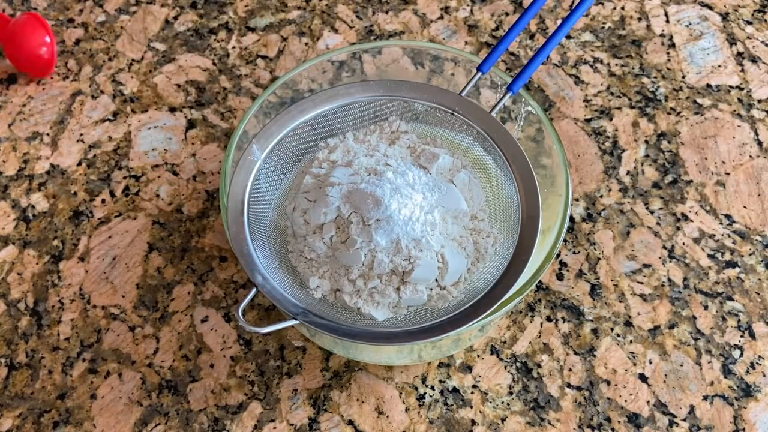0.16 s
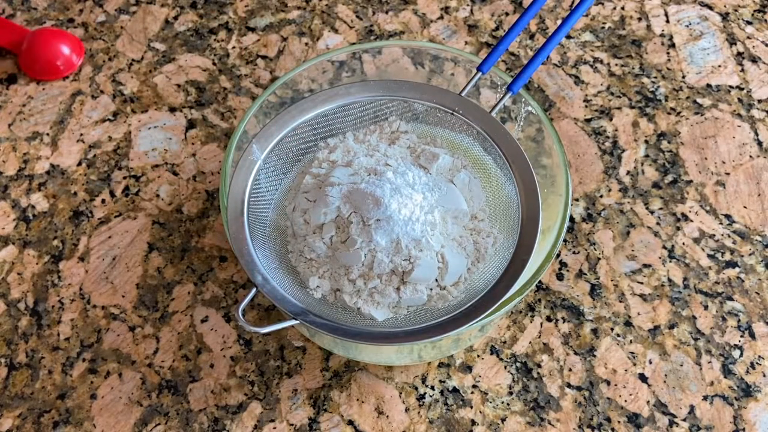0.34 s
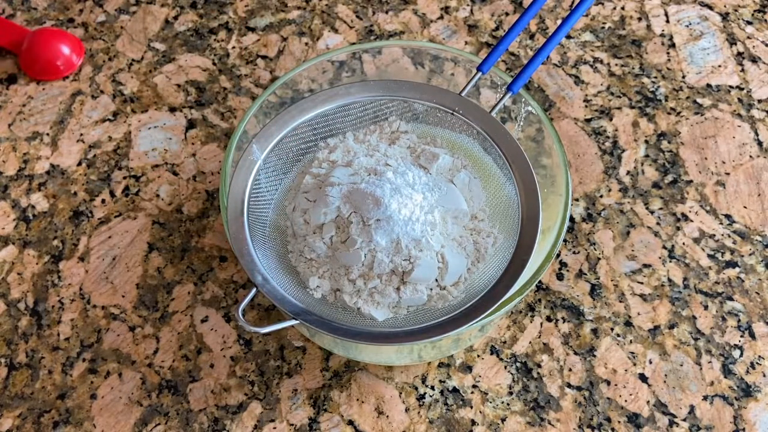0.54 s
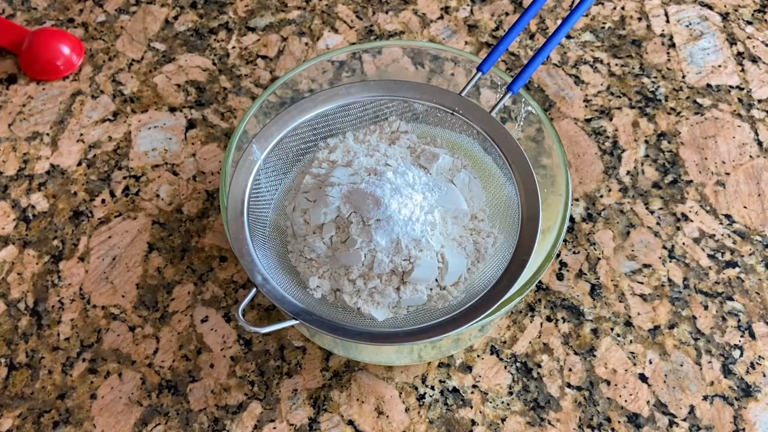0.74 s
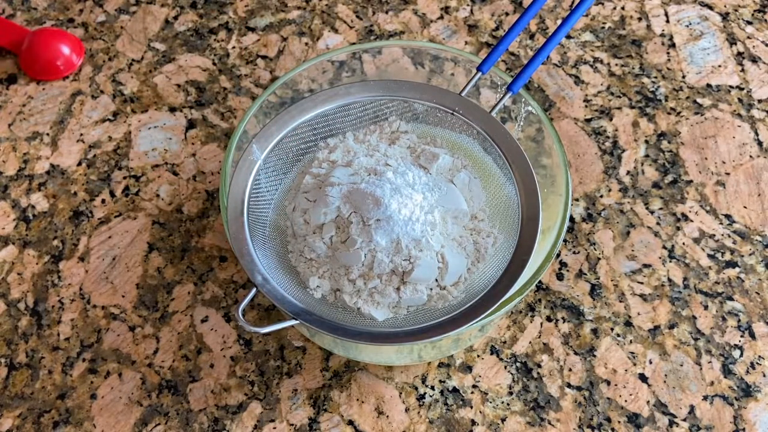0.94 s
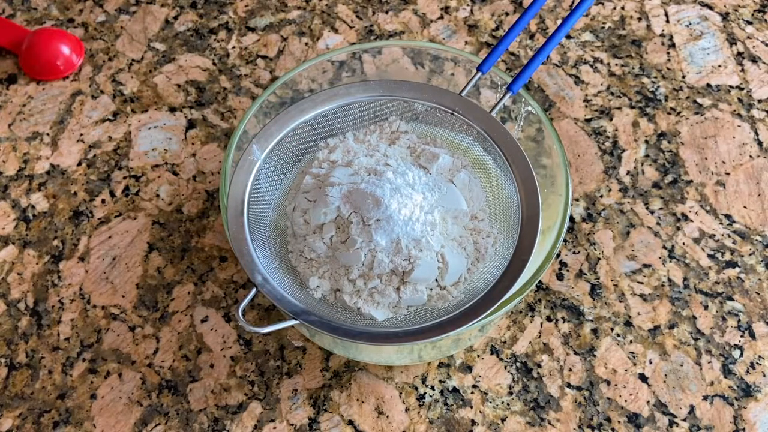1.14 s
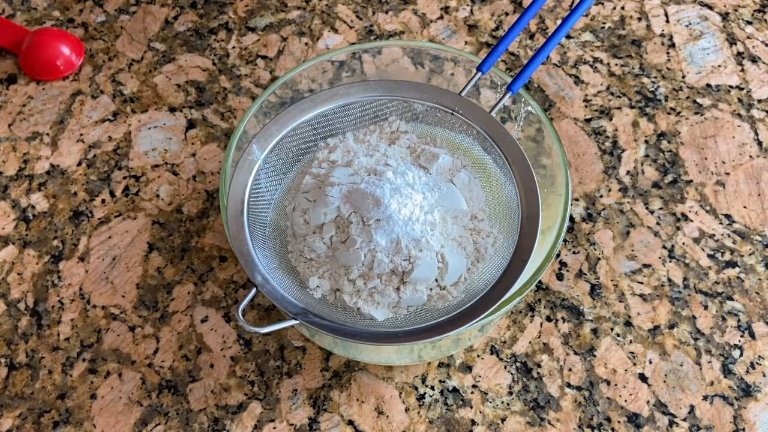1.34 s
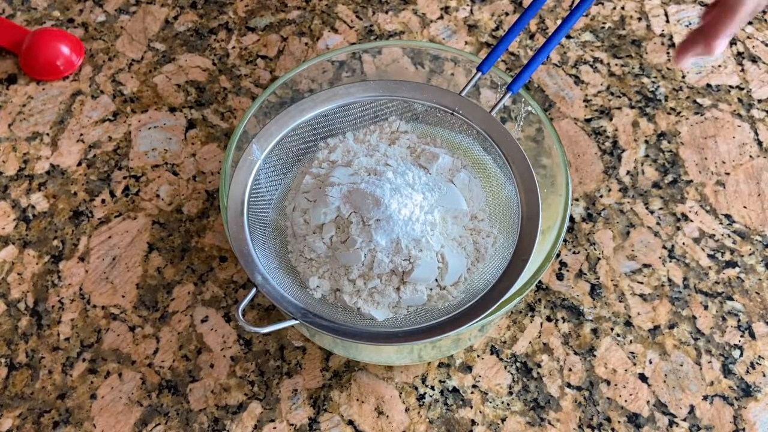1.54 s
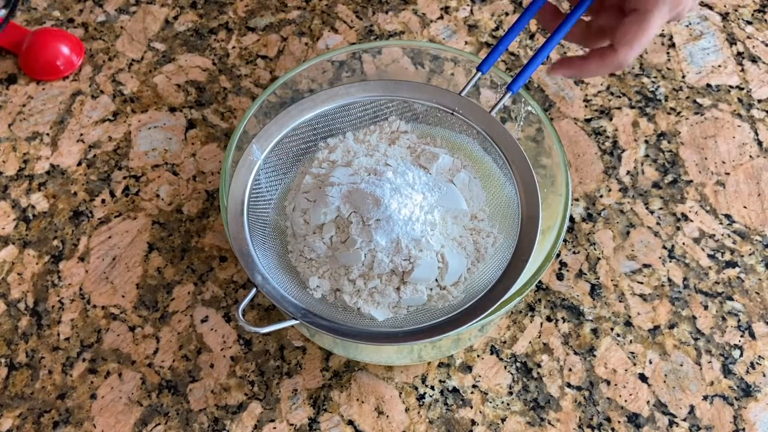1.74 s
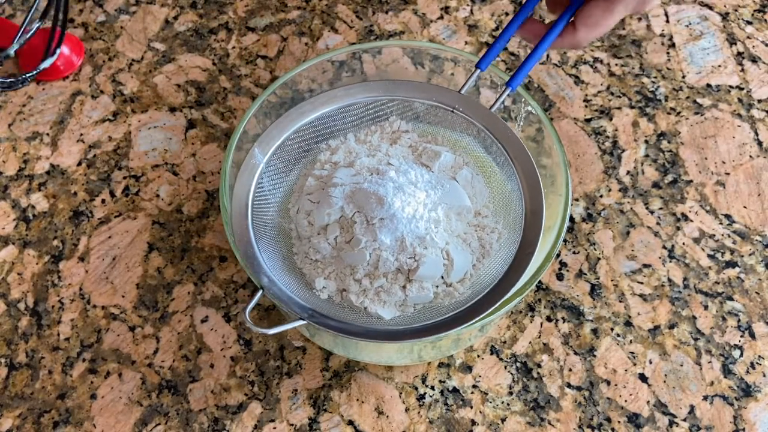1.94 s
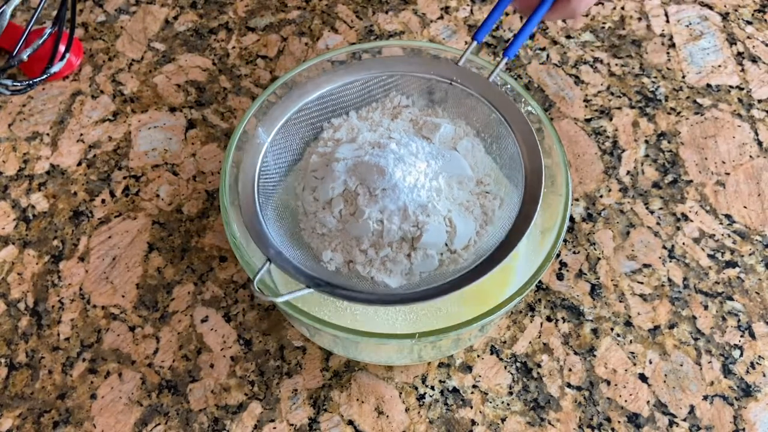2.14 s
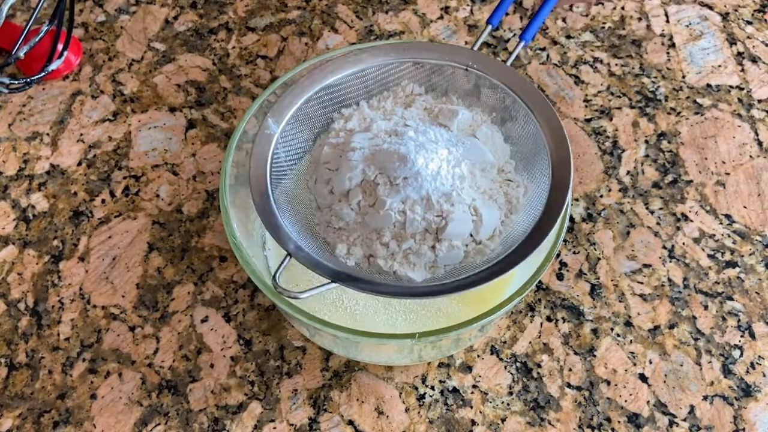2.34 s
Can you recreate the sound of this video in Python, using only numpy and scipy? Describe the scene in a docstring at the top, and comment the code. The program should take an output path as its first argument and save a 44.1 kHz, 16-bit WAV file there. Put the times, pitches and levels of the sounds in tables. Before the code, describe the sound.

Steel kitchen utensils crash down on a hard counter, later a wire sieve scrapes and clinks glass

```python
"""Utensils and a glass bowl

Metal utensils clatter down on a stone kitchen counter, close to the microphone: sharp blows ring steel modes.
Later a wire sieve is lifted off a glass mixing bowl: it ticks, scrapes along the rim in tiny random clicks
and clinks the glass, which rings as decaying modes. Decaying noise is the small hard room that answers
each contact; shaped noise and slow wavering tones make the room noise and the low appliance hum."""
import sys
import numpy as np
from scipy import signal
from scipy.fft import rfft, irfft
from scipy.io import wavfile

SR = 44100
rng = np.random.default_rng(int(sys.argv[2]) if len(sys.argv) > 2 else 0)


def master(y):
    """Save y as 16-bit WAV."""
    cut = np.clip(np.atleast_2d(y).T, -1, 1)
    pcm = np.round(cut * 32767)  # scale
    wavfile.write(sys.argv[1], SR, pcm.astype(np.int16))


N = 110250
T = np.arange(N) / SR  # time in seconds
SIZE = 2 * N  # filter length with room for the tails
FREQ = np.maximum(np.fft.rfftfreq(SIZE, 1 / SR), 1)  # frequencies in Hz, kept above zero


def undb(db):
    """Turn decibels into gain."""
    return 10 ** (np.asarray(db) / 20)


def unit(x):
    """Scale to an rms of one."""
    return x / np.sqrt(np.mean(x ** 2))


def decay(t, t60):
    """Fade by 60 dB in every t60 seconds."""
    return np.exp(-np.log(1000) * t / t60)


def over_hz(points, hz=FREQ):
    """Read a curve of (Hz, value) points, joined by straight lines on a log-frequency axis."""
    f, v = np.array(points, float).T
    return np.interp(np.log(hz), np.log(f), v)


def shape(x, db):
    """Filter with the given dB response, in minimum phase so that nothing sounds early."""
    cepstrum = irfft(np.log(undb(db)))
    cepstrum[1:N] *= 2
    cepstrum[N + 1:] = 0
    response = np.exp(rfft(cepstrum))
    return irfft(rfft(x, SIZE) * response)[..., :N]


def noise(colour, channels=2):
    """Coloured noise at an rms of one, unrelated between channels."""
    spectrum = rfft(rng.standard_normal((channels, SIZE)))
    return unit(irfft(spectrum * undb(over_hz(colour)))[:, :N])


def swell(curve):
    """Gain over time from a curve of (seconds, dB) points."""
    return undb(np.interp(T, *np.array(curve).T, left=-120, right=-120))


def through(x, response):
    """Pass a sound through an impulse response."""
    return signal.fftconvolve(np.atleast_2d(x), np.atleast_2d(response), axes=1)[:, :N]


def place(x, at, pan_db, lag_ms):
    """Start a sound at a time, with a level difference (left over right) and a lag of the left side."""
    out = np.zeros((2, N))
    for channel, side in enumerate((1, -1)):
        start = max(int(round((at + side * lag_ms / 2000) * SR)), 0)
        out[channel, start:] = x[:N - start] * undb(side * pan_db / 2)
    return out


RING_S = 0.4  # every ring is cut off here


def ring(modes, detune=0):
    """Decaying modes of set energy, detuned at random by up to a share, each in its own phase per channel."""
    out, t = 0, T[T < RING_S]
    draws = rng.uniform(-1, 1, (len(modes), 3))
    for (hz, db, t60), (turn, apart, off) in zip(modes, draws):
        phase = 2 * np.pi * hz * (1 + detune * off) * t + np.pi * turn
        phase = phase + apart * np.array([[1], [-1]])
        wave = np.sin(phase) * decay(t, t60)
        out = out + undb(db) * wave / np.sqrt(np.sum(wave ** 2) / 2)
    return out


BASS_HZ, MID_HZ, BRIGHT_HZ, TREBLE_HZ = 870, 2200, 6400, 10900  # corners of the contact colour
LOW_CUT_HZ, LIFT_OCTAVES = 506, 0.31  # bass cut; distance from the resonance where its lift has halved
CHATTER_DB = 0
CHATTER_LIFT_SHARE = 0.78  # the chatter excites the main resonance less than the blow does


def contact(t60, db, bass_db, treble_db, hz, lift_db):
    """One contact: the bare blow, and the blow with its brief chatter, coloured by the spot that is struck."""
    colour = db + over_hz([(BASS_HZ, bass_db), (MID_HZ, 0), (BRIGHT_HZ, 0), (TREBLE_HZ, treble_db)])
    colour = colour - 10 * np.log10(1 + (LOW_CUT_HZ / np.maximum(FREQ, 50)) ** 6)
    lift = lift_db / (1 + (np.log2(FREQ / hz) / LIFT_OCTAVES) ** 2)
    blow = shape(signal.unit_impulse(N), colour + lift)
    # the square root makes the chatter rise softly before it fades
    chatter = rng.standard_normal(N) * np.sqrt(T) * decay(np.minimum(T, 10 * t60), t60)
    chatter = shape(chatter / np.linalg.norm(chatter), colour + CHATTER_LIFT_SHARE * lift)
    return blow, (blow + undb(CHATTER_DB) * chatter) / np.sqrt(2)


CLICK_SPREAD_DB = 3.5  # how much the click sizes vary


def grains(per_s, colour):
    """A dense random stream of tiny coloured clicks, at an rms of one."""
    sizes = undb(CLICK_SPREAD_DB * np.clip(rng.standard_normal(N), -2, 2))
    happens = rng.random(N) < per_s / SR
    signs = np.sign(rng.standard_normal(N))
    return unit(shape(happens * signs * sizes, over_hz(colour)))


# Tone of the room noise. Each row: frequency in Hz, relative level in dB.
AIR_COLOUR = [(15, -33.5), (25, -12.5), (53, -2), (170, -6), (200, 1), (229, -10.5), (270, -6), (373, -12),
              (405, -10.5), (503, -19), (607, -18), (1070, -26.5), (2990, -39), (3720, -46), (7510, -58),
              (8830, -67.5), (16000, -57.5)]
AIR_DB, AIR_WIDE_HZ, BACKGROUND_PAN_DB = -40.5, 550, -0.9
# Steady tones of the appliance. Each row: frequency in Hz, level in dB before the wavering is added.
HUM_TONES = [(50.5, -58), (101, -53), (151.5, -51.5), (200.5, -54), (296, -57.5), (414, -55.5)]


def background():
    """Low room noise, narrow in the bass and wider above, with hum tones that waver in level and phase."""
    mid, side = noise(AIR_COLOUR)
    side = shape(side, over_hz([(50, -14), (AIR_WIDE_HZ / 2, -6), (AIR_WIDE_HZ, -2)]))
    out = undb(AIR_DB) * np.array([mid + side, mid - side])
    for hz, db in HUM_TONES:
        a, b = noise([(1, 7.5), (4, 2), (12, -31), (60, -120)])  # slow random drifts
        waver = 1 + 0.86 * (a + 1j * b)
        out = out + undb(db) * np.real(waver * np.exp(2j * np.pi * hz * T))
    return out * undb(np.array([[1], [-1]]) * BACKGROUND_PAN_DB / 2)


# Tone of the sound already dying away. Each row: frequency in Hz, relative level in dB.
TAIL_COLOUR = [(300, -10), (1000, 3), (1700, 3), (3000, -0.5), (5000, -6), (6800, 5.5), (8000, -6),
               (11000, -13.5), (15500, -10.5)]
TAIL_DB, TAIL_T60_S = -32.5, 0.46  # level at the start; time to fade by 60 dB


def opening_tail():
    """Fading noise from the first moment, as the room still rings from a clatter just before."""
    return noise(TAIL_COLOUR) * undb(TAIL_DB) * decay(T, TAIL_T60_S)


WIRE_LOW_HZ, WIRE_HIGH_HZ, WIRE_T60_S, WIRE_DB = 4140, 5647, 0.43, -19  # the level is for each wire


def wires(count):
    """Modes of many thin wires of slightly different lengths, spread at random over a band."""
    spots = (np.arange(count) + rng.random(count)) / count
    return [(WIRE_LOW_HZ * (WIRE_HIGH_HZ / WIRE_LOW_HZ) ** spot, WIRE_DB, WIRE_T60_S) for spot in spots]


# Utensil contacts. Each row: start in seconds, level in dB, bass in dB, treble in dB, main resonance in Hz,
# its lift in dB, left over right in dB, lag of the left side in ms.
CLATTER = [(0.1598, -8.5, 0, -4.5, 3830, 10.5, 5.5, 0), (0.1696, -20, -1.5, -4.5, 3900, 16, 0, 0),
           (0.2031, -13, 2.5, -3, 1400, 14, 4, .27), (0.2159, -7.5, 0.5, -5, 6840, 4.5, 3, .27),
           (0.2253, -6, -2, -13, 2850, 9.5, 3, -.29), (0.2279, -2.5, -3.5, -11, 2740, 14.5, 3.5, -0.22),
           (0.2365, -6.5, 7, -10.5, 2850, 16, 7, -.29), (0.2545, 6, -8, -12.5, 2800, 10.5, 5, -.29),
           (0.2577, 14, -5.5, -6, 1693, 14, 4.5, -.14), (.2618, 7.5, -7.5, 5.5, 1690, 8, -2, .27),
           (0.2907, -1.5, 1, -19, 1730, 13.5, 3.5, .4), (0.2926, -5, -7, -5, 4240, 12, 4.5, -.29),
           (0.2995, 13, -8, -16.5, 3640, 6, 1, 0), (0.3022, 5, 3.5, -14, 2750, 16.5, -4, -.2),
           (0.3306, -6, -6, 5.5, 6050, 5, 0.5, .27), (.3373, 4.5, -4, -10.5, 4300, 14.5, 8, -.25),
           (0.347, -1.5, -10, -1, 4280, -9.5, 2, -.4), (0.3637, -0.5, -6, -7, 4940, 10, -7, .27)]
# Faint taps as things settle. Each row: the same columns as the utensil contacts.
SETTLING_TAPS = [(0.544, -23, 0.0089, -30, 2350, 22.7, 4.5, -0.53),
                 (0.62, -30.5, 0.0047, -19.5, 2580, 22, 2, -.3),
                 (0.64, -31, 0.0049, -46, 2600, 22.1, 1.84, -0.37)]
# Ringing tones of the steel. Each row: frequency in Hz, relative level in dB, 60 dB fading time in seconds.
STEEL_MODES = [(1360, -7, .2), (1497, -9, .25), (1591, -9, .25), (1743, -11, .3), (1770, -8, .5),
               (2681, -9, .22), (3632, -8, .28), (3741, -6, .3), (3865, -9, .28), (4003, -7, .4),
               (4163, -6, .4), (4399, -4, .42), (4886, -6, .42), (6222, -11, .22)]
# Tiny contacts between the blows. Each row: time in seconds, level in dB before they are halved and placed.
JANGLE_LEVEL = [(.2, -55.5), (.25, -42.5), (.264, -29), (.287, -36), (.305, -21), (.328, -35), (.345, -28),
                (.372, -25.5), (.395, -42.5), (.43, -61)]
# Tone of those tiny contacts. Each row: frequency in Hz, relative level in dB.
JANGLE_COLOUR = [(400, -20), (1000, -6.5), (1400, -2), (1750, 1), (2100, 0), (2800, -4), (4400, 3),
                 (6500, -6), (10000, -14), (15500, -13)]
JANGLES_PER_S = 640
STEEL_CHATTER_T60_S, STEEL_DB, STEEL_DETUNE = 0.010, -17, 0.012  # detune is a share of the frequency


def utensils():
    """Steel utensils bounce, jangle and settle on the counter; each contact rings them a little differently."""
    blows, out = 0, 0
    for at, *colour, pan_db, lag_ms in CLATTER + SETTLING_TAPS:
        blow, crack = contact(STEEL_CHATTER_T60_S, *colour)
        blow = place(blow, at, pan_db / 2, 0) * undb(STEEL_DB)
        blows = blows + blow
        out = out + place(crack, at, pan_db, lag_ms) + through(blow, ring(STEEL_MODES, STEEL_DETUNE))
    # two separate streams, each heard from its own direction
    first, second = (grains(JANGLES_PER_S, JANGLE_COLOUR) * swell(JANGLE_LEVEL) / 2 for _ in range(2))
    jangle = place(first, 0, pan_db=5, lag_ms=-.28) + place(second, 0, pan_db=-0.5, lag_ms=.27)
    return out + jangle + through(blows, ring(wires(count=40)))


# How long the room rings. Each row: frequency in Hz, 60 dB fading time in seconds.
ROOM_T60 = [(300, 0.37), (1400, 0.42), (4500, 0.51), (8000, 0.39), (15000, 0.27)]
# Tone of the room. Each row: frequency in Hz, relative level in dB.
ROOM_COLOUR = [(200, 0), (1500, 4.5), (4500, -4), (8000, -0.5), (15000, -2.5)]
ROOM_DELAY_S = 0.0055  # silent until here, then rising to full over the same time again


def kitchen():
    """Dense reflections of the hard room, as noise bands: the top treble dies fastest."""
    spectrum = rfft(rng.standard_normal((2, SIZE)))
    out = 0
    for hz in np.geomspace(125, 16000, 8):  # one band per octave
        band = np.maximum(1 - abs(np.log2(FREQ / hz)), 0) * undb(over_hz(ROOM_COLOUR))
        out = out + irfft(spectrum * band)[:, :N] * decay(T, over_hz(ROOM_T60, hz))
    out = out * np.clip(T / ROOM_DELAY_S - 1, 0, 1)
    return out / np.sqrt(np.sum(out ** 2) / 2)


# Loudness of the soft handling rustle. Each row: time in seconds, level in dB.
RUSTLE_LEVEL = [(.5, -75), (.7, -60), (.85, -59.5), (.95, -64.5), (1.1, -62.5), (1.3, -70), (1.47, -58),
                (1.58, -73.5), (1.85, -70)]
# Tone of the rustle. Each row: frequency in Hz, relative level in dB.
RUSTLE_COLOUR = [(600, -6.5), (1500, 1), (2700, 1.5), (4500, -7), (7000, -8.5), (15000, -16)]
BRUSH_S, BRUSH_WIDTH_S, BRUSH_DB = 1.025, .024, -51.5  # middle, half width and peak level


def handling():
    """Faint rustle of things being moved, as swelling noise, with one brief bright brush."""
    brush = noise([(1000, -34), (6000, 2.5), (15000, 4)]) * undb(BRUSH_DB)
    brush = brush * np.exp(-((T - BRUSH_S) / BRUSH_WIDTH_S) ** 2)
    return noise(RUSTLE_COLOUR) * swell(RUSTLE_LEVEL) + brush


# Sieve against bowl. Each row: start in seconds, level in dB, bass in dB, treble in dB, main resonance in Hz,
# its lift in dB, left over right in dB, lag of the left side in ms, push on the glass in dB.
SIEVE_HITS = [(1.8893, -8.5, 0.5, 2, 1500, 16.5, 5, -0.22, -33),
              (1.9272, -18, -4, 1.5, 4500, 6, 1, 0.26, -27),
              (1.9442, -12.5, 17, -24, 1048, 5.5, 1.5, 0.0023, -5.5),
              (1.9925, -18.5, 10, -10, 1246, 10, 7, -0.15, -1),
              (2.0290, -22, 5, -9, 2470, 17, 0, -0.0033, 4),
              (2.1194, -9.5, 10, 5.5, 1350, 6.5, -2, 0.0048, -7.5),
              (2.1245, -2, 9.5, -4.5, 1790, 7, 1, -0.057, -1.5)]
# Pressure of the sieve on the rim. Each row: time in seconds, level in dB.
SCRAPE_PRESSURE = [(1.89, -44), (1.94, -50), (1.951, -40.5), (1.965, -49.5), (1.981, -43), (1.986, -34.5),
                   (1.996, -36), (2.004, -34.5), (2.014, -35), (2.03, -37.5), (2.058, -41), (2.072, -82),
                   (2.1, -74)]
# Tone of the scrape. Each row: frequency in Hz, relative level in dB.
SCRAPE_COLOUR = [(300, -23), (600, -6.5), (930, 3.5), (1200, 2), (1550, -8), (1860, -6), (2700, -5.5),
                 (3600, -16), (7000, -22), (15000, -24)]
# Ringing tones of the sieve frame. Each row: frequency in Hz, relative level in dB, 60 dB fading time in seconds.
FRAME_MODES = [(921, -0.5, 0.038), (1190, -3, .03), (1842, -4, 0.028), (2465, -5, .08), (2820, -9, 0.029)]
# Ringing tones of the bowl. Each row: frequency in Hz, relative level in dB, 60 dB fading time in seconds.
GLASS_MODES = [(578, -10.5, 0.33), (651, -9.5, .11), (1180, -6.5, .05), (1412, -5.5, .38),
               (1900, -7.5, 0.033), (2462, -5, 0.25), (3738, 2.5, 0.31), (5230, -7.5, 0.426),
               (5288, -3, 0.18), (7030, -9.5, 0.358), (10150, -4, 0.13), (11370, -14, 0.216),
               (11580, -22, 0.28), (14500, -18.5, .1)]
CATCHES_PER_S, SIEVE_CHATTER_T60_S = 1100, .018
FRAME_DB, GLASS_DB, SCRAPE_PUSH_DB = -19, -2.5, -8  # frame ring; whole glass ring; scrape's push on the glass


def sieve():
    """The sieve ticks, drags over the rim in tiny catches and knocks the bowl; all of it rings the glass."""
    drag = grains(CATCHES_PER_S, SCRAPE_COLOUR) * swell(SCRAPE_PRESSURE)
    scrape = place(drag, 0, pan_db=1.0, lag_ms=-.06)
    push = scrape * undb(SCRAPE_PUSH_DB)
    mesh = scrape + undb(FRAME_DB) * through(scrape, ring(FRAME_MODES))
    for at, *colour, pan_db, lag_ms, push_db in SIEVE_HITS:
        blow, crack = contact(SIEVE_CHATTER_T60_S, *colour)
        mesh = mesh + place(crack, at, pan_db, lag_ms)
        push = push + undb(push_db) * place(blow, at, pan_db, 0)
    glass = undb(GLASS_DB) * through(push, ring(GLASS_MODES))
    return mesh, glass


# Sound that the sieve throws into the room. Each row: frequency in Hz, relative level in dB.
SIEVE_SPREAD = [(4000, -1.5), (8000, 2), (15000, -4.5)]
CLATTER_ROOM_DB, SIEVE_ROOM_DB = -9.5, -9  # how strongly each one feeds the room


def scene():
    """Utensils, sieve and bowl in the kitchen; the room answers the steel and the sieve."""
    steel = utensils()
    mesh, glass = sieve()
    send = undb(CLATTER_ROOM_DB) * steel + undb(SIEVE_ROOM_DB) * shape(mesh, over_hz(SIEVE_SPREAD))
    room = through(send, kitchen())
    return background() + opening_tail() + steel + room + handling() + mesh + glass


# Tone of the microphone. Each row: frequency in Hz, level in dB.
MIC_COLOUR = [(20, -1.5), (7000, 1), (8200, -4), (9100, -20), (9800, 2.5), (12200, 2.5), (13300, -7),
              (14400, 0), (15700, 0)]
TOP_HZ = 15850  # almost nothing passes above this


def record(dry):
    """Microphone colour, then a full-scale limit, then a steep cut of the top."""
    heard = np.clip(shape(dry, over_hz(MIC_COLOUR)), -1, 1)
    top_cut = signal.ellip(10, .2, 70, TOP_HZ, fs=SR, output="sos")
    return signal.sosfilt(top_cut, heard)


dry = scene()
out = record(dry)
master(out)
```